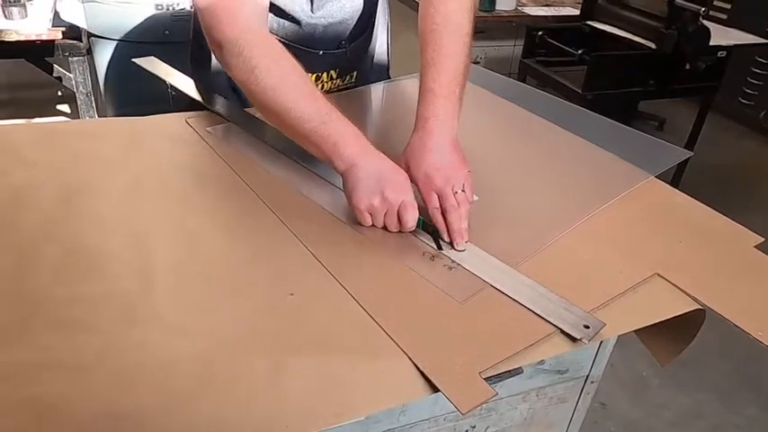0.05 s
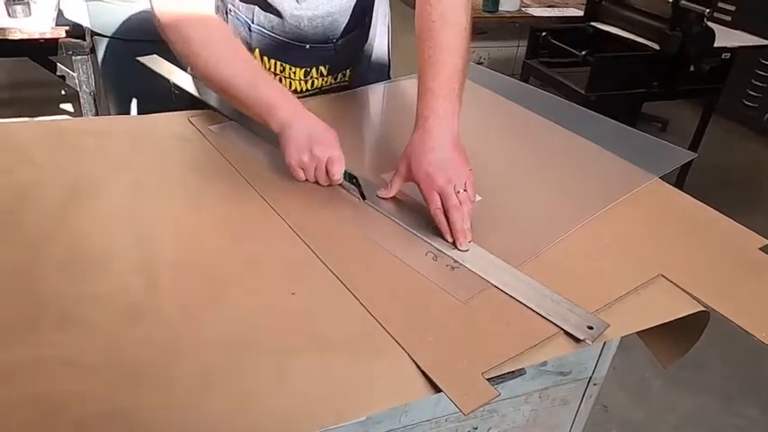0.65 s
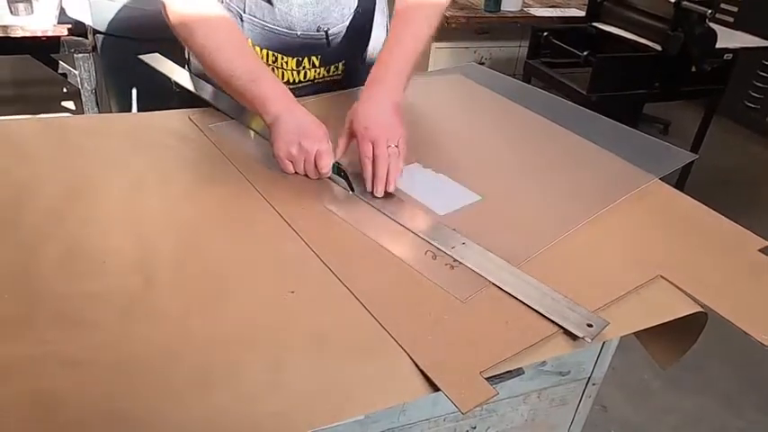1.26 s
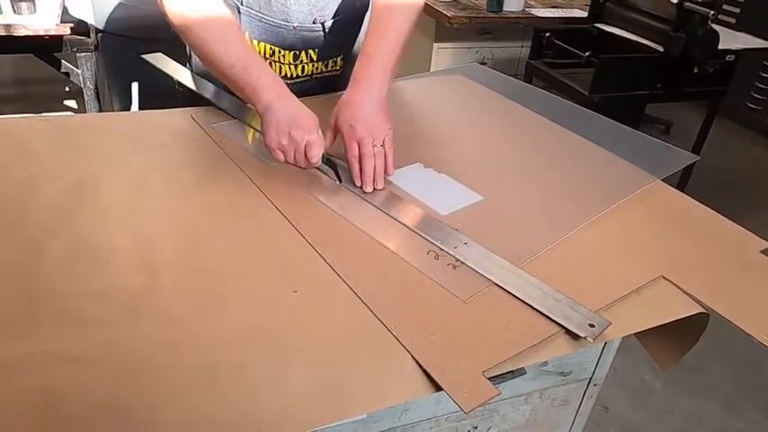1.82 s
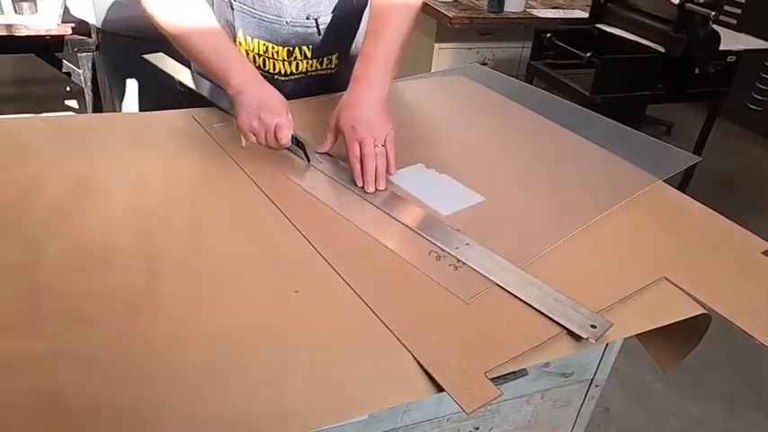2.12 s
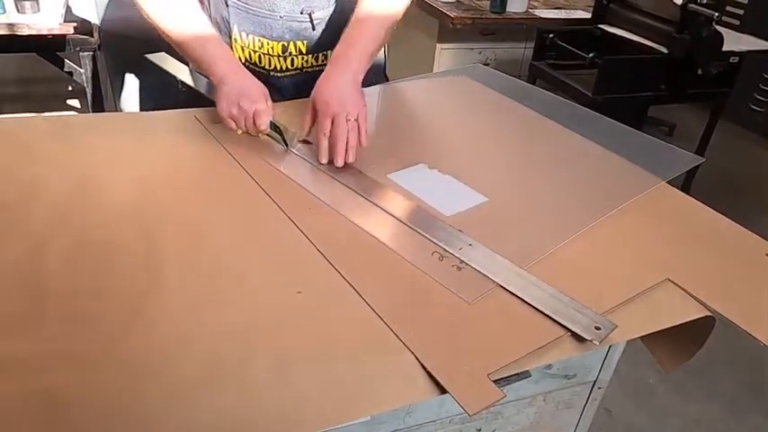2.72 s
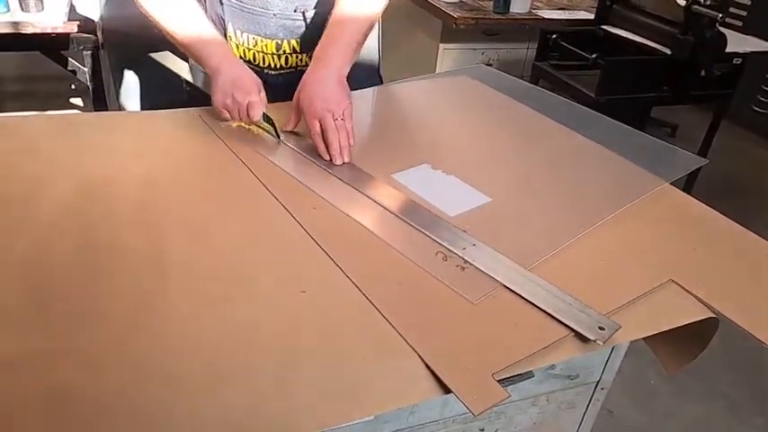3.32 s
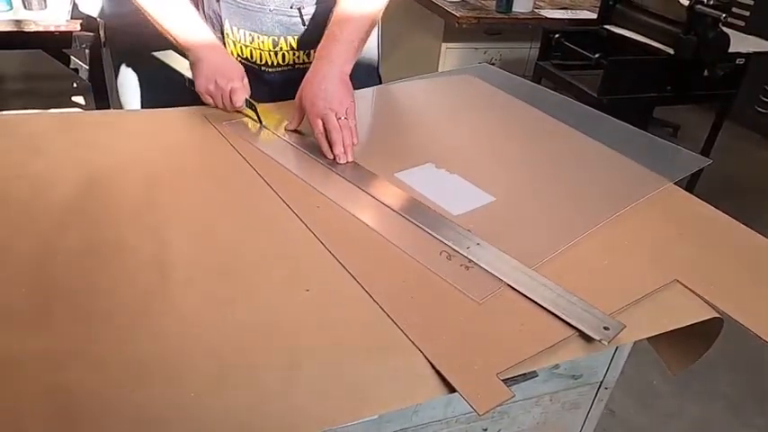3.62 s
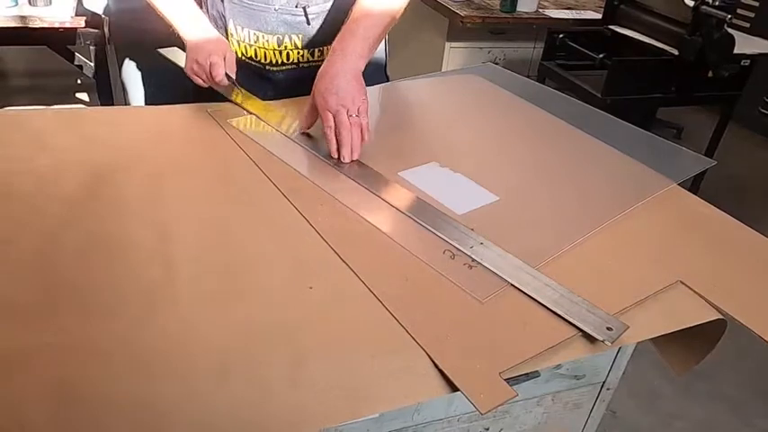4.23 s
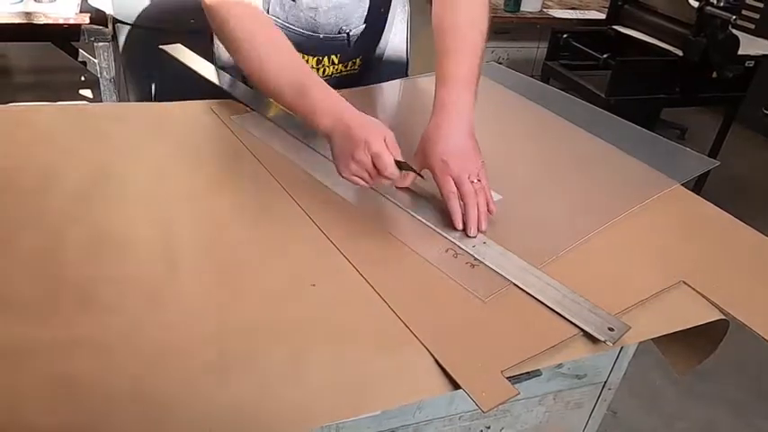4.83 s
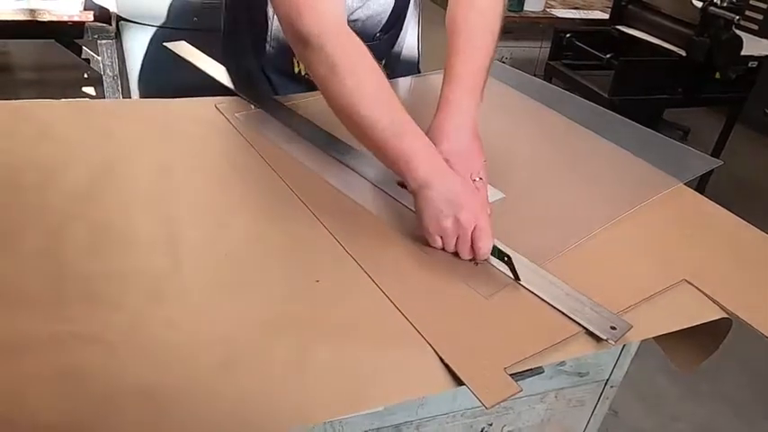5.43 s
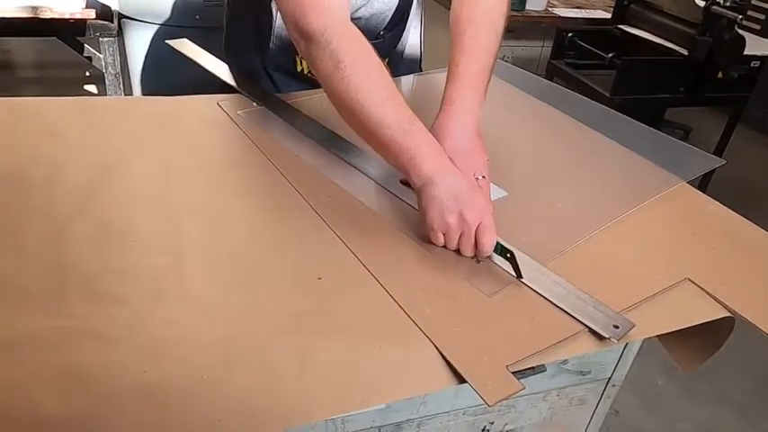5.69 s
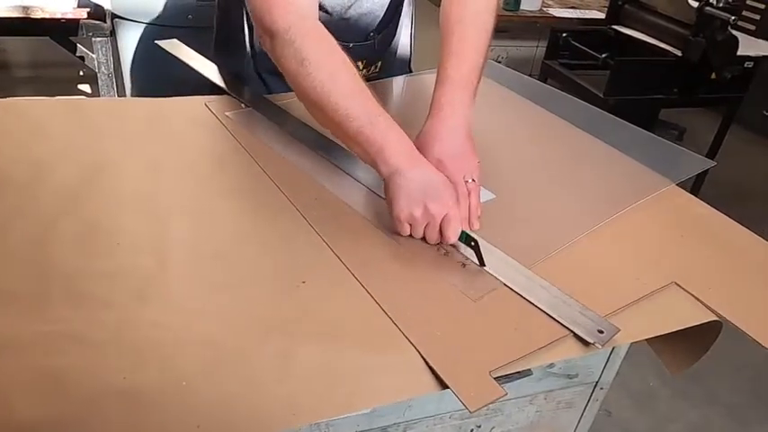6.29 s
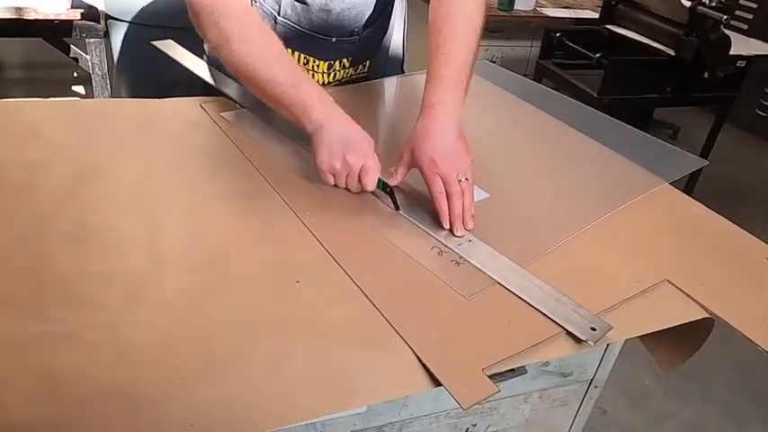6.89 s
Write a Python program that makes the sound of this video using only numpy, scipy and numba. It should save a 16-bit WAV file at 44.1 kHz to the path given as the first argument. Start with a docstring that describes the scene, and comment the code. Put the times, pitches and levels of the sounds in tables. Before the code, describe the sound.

A small tool scores a plastic sheet along a steel straightedge in four rasping, squealing strokes, over a low workshop hum.

```python
"""Scoring an acrylic sheet

A hooked tool is pulled four times along a steel straightedge over an acrylic sheet on a workbench.
Its tip sticks and slips at a rate that follows the hand: ticks at first, then a rough squeal that
rises with speed. Every slip rings the sheet and tears off chips. The workshop echoes it all over the
low hum of its ventilation, and an automatic gain control dips a little under the loudest stroke."""
import sys
import numpy as np
from scipy import signal
from scipy.fft import rfft, irfft
from scipy.io import wavfile
from scipy.ndimage import uniform_filter1d
from numba import njit

SR = 44100
rng = np.random.default_rng(int(sys.argv[2]) if len(sys.argv) > 2 else 0)


def unload_audio(sound):
    """Save the sound as a 16-bit wav file, at the path given as the first command line argument."""
    columns = np.transpose(np.atleast_2d(sound))
    # keep every value between -1 and 1, then stretch to whole-number steps
    steps = np.round(np.clip(columns, -1, 1) * 32767)
    wavfile.write(sys.argv[1], SR, steps.astype(np.int16))


N = 306495
T = np.arange(N) / SR
FREQ = np.maximum(np.arange(N // 2 + 1) * SR / N, 1)

# the four pulls of the hand: start_s, end_s, press_down_s, extra_weight_db
STROKES = [(-.1, 0.876, 0.011, -0.35), (1.713, 2.48, 0.011, 1), (3.205, 3.936, .01, 0.1),
           (6.0, 7.05, 0.22, 1)]
# how strongly the sheet sends out each frequency: frequency_hz, level_db
SHEET_TONE = [(30, -67), (150, -65), (350, -7), (560, -8.5), (720, -6), (920, 4.5), (1300, 2), (1900, -6.5),
              (2900, -10), (3900, -13), (5000, -7), (6500, -12.5), (8100, -16), (9200, -23.5),
              (10200, -17.5), (11300, -23), (12200, -20), (15500, -37.5)]


def undb(db):
    """Turn decibels into a plain multiplier."""
    return 10 ** (np.asarray(db) / 20)


def unit(x):
    """Scale to an average (rms) level of 1."""
    return x / np.sqrt(np.mean(x ** 2))


def even(x, span_s=0.12):
    """Hold the level near 1 over time, keeping the fast grain."""
    power = np.abs(uniform_filter1d(x ** 2, int(span_s * SR)))
    return x / np.sqrt(power + 1e-6 * np.mean(x ** 2))


def curves(rows):
    """Join each column of a table by straight lines in time."""
    times, *columns = np.transpose(rows)
    return [np.interp(T, times, column) for column in columns]


def during(start, end):
    """1 from start to end, with soft edges."""
    return uniform_filter1d(1. * ((T >= start) & (T <= end)), SR // 200)


def db_at(points):
    """Join (frequency_hz, level_db) points into a level for every frequency."""
    hz, db = np.transpose(points)
    return np.interp(np.log(FREQ), np.log(hz), db)


def colour(x, db, size=4096):
    """Filter a sound so that each frequency changes by the given decibels."""
    gain = undb(np.interp(np.linspace(0, SR / 2, size // 2 + 1), FREQ, db))
    # folding the cepstrum makes the filter ring after a hit, never before it
    cepstrum = irfft(np.log(gain))
    cepstrum[1:size // 2] *= 2
    cepstrum[size // 2:] = 0
    return signal.oaconvolve(x, irfft(np.exp(rfft(cepstrum))))[:N]


def split(x, hz):
    """The parts below and above a frequency."""
    return [signal.sosfilt(signal.butter(4, hz, kind, fs=SR, output="sos"), x)
            for kind in ("low", "high")]


def tilt(x, hz, db):
    """Raise or lower everything above a frequency, moment by moment."""
    low = signal.sosfiltfilt(signal.butter(3, hz, fs=SR, output="sos"), x)
    return low + undb(db) * (x - low)


def wander(rate_hz):
    """A random curve of size about 1 that heads for a new value rate_hz times a second."""
    hold = max(int(SR / rate_hz), 1)
    steps = np.repeat(rng.standard_normal(N // hold + 1), hold)
    return unit(uniform_filter1d(steps, hold)[:N])


def sine(hz):
    """A pure tone that follows a changing pitch."""
    return np.sin(2 * np.pi * np.cumsum(hz) / SR)


def diffuse(db, apart_hz):
    """Noise from all sides: left and right are alike in the bass, unrelated in the treble."""
    mid, side = rfft(rng.standard_normal((2, N))) * undb(db)
    side = side * np.minimum(0.013 + FREQ / apart_hz, 1)
    return irfft(np.array([mid + side, mid - side]), N)


def hand(stroke, pull, effort, creep_hz=250.34, creep_hold=0.2, creep_rough=0.34, touch_db=-8.5):
    """The hand presses down, speeds up and brakes; the slower it moves, the quieter and duller."""
    start, end, press_s, weight_db = stroke
    pull_hz, groove, grip = curves(pull)
    body_db, treble_db = curves(effort)
    run_up = np.interp(T, [start + press_s, pull[0][0]], [0, 1])
    brake = np.interp(T, [pull[-1][0], end], [1, 0])
    hz = creep_hz + (pull_hz - creep_hz) * run_up * brake
    octaves = np.log2(hz / pull_hz)
    press_db = weight_db + 20 * np.log10(np.interp(T, [start, start + press_s], [undb(touch_db), 1]))
    db_per_octave = np.where(brake < 1, 9.5, 7)
    level_db = body_db + press_db + octaves * db_per_octave
    bite_db = treble_db - body_db + octaves * 6.5  # a deeper bite means more treble
    # at a creep the tip lets go unevenly and holds through a share of its slips
    creep = (1 - run_up * brake) ** 2
    slip_hz = hz * (1 - creep_hold * creep)
    return np.array([slip_hz, level_db, bite_db, groove + creep_rough * creep, np.clip(grip + creep, 0, 1)])


def gestures():
    """The hand's strokes in turn: each takes over midway through the pause before it."""
    # the tip in full pull, a table per stroke: time_s, slip_hz, roughness (0-1), second_corner_grip (0-1)
    pulls = [
        [(0, 844, 0.08, 0.06), (.07, 818, 0.1, 0.44), (.15, 844, 0.11, 0.15), (.23, 876, 0.08, 0.2),
         (.3, 976, 0.07, 0.2), (.42, 1094, 0.07, 0.07), (.55, 1249, 0.09, 0.33), (.73, 1461, 0.11, 0.17),
         (.775, 1264, 0.08, 0.49), (.8, 1075, 0.02, 0), (.83, 842, .07, 0.4)],
        [(1.785, 680.3, 0.1, 0.1), (1.83, 795, .075, 0.11), (1.87, 935, .085, 0.14), (1.95, 1032, .12, 0.25),
         (2.02, 1172, .15, 0.25), (2.08, 1371, 0.14, 0.37), (2.125, 1114, 0.15, 0.86), (2.18, 1470, 0.11, 0.2),
         (2.22, 1408, .15, 0.2), (2.29, 1544, 0.1, 0), (2.365, 1421, 0.15, 0.16), (2.39, 1096, 0.14, 0.7),
         (2.425, 917.5, 0.14, 0.8), (2.455, 959, 0.21, 0.9)],
        [(3.29, 891, 0.23, 0.81), (3.335, 961, 0.15, 0.7), (3.41, 869.7, 0.2, 0.86), (3.5, 911, 0.2, .6),
         (3.56, 1022, .21, 0.7), (3.62, 956.5, .25, 1), (3.72, 984, .16, 0.61), (3.87, 950.3, 0.18, 0.79),
         (3.91, 783, 0.14, 0.86)],
        [(6.39, 767.3, 0.14, 0.23), (6.43, 832, 0.13, 0.34), (6.47, 940, 0.17, 0.77), (6.53, 992, 0.21, 0.45),
         (6.58, 1033, 0.21, 0.98), (6.7, 1004, 0.13, 1), (6.76, 1200, 0.17, 0.71), (6.81, 1468, 0.18, 0.57),
         (6.845, 1740, 0.15, 0.44), (6.91, 1795, 0.2, 0.61), (6.94, 1863, 0.21, 0.5)],
    ]
    # strength of the pull, a table per stroke: time_s, body_db, treble_db
    efforts = [
        [(0.0, -24.5, -33), (0.124, -29, -31), (.165, -25.5, -29.5), (.22, -25.5, -28.5), (0.29, -23, -28),
         (0.408, -23, -28.5), (0.448, -24.5, -28.5), (0.73, -27.5, -25.5), (0.794, -21.5, -28.5),
         (0.804, -28.5, -28), (0.83, -26.5, -33)],
        [(1.79, -29.5, -36.5), (1.81, -28, -36.5), (1.846, -30, -35.5), (1.875, -26.5, -34),
         (1.988, -27.5, -33.5), (2.042, -25, -29), (2.41, -31, -30.5), (2.45, -32.5, -42)],
        [(3.29, -31, -39), (3.34, -27, -34.5), (3.382, -33, -36), (3.474, -33, -34), (3.508, -34.5, -34),
         (3.75, -32.5, -31), (3.782, -35, -33), (3.9, -31, -33), (3.91, -34.5, -39.5)],
        [(6.39, -30.5, -41), (6.47, -23.5, -31), (6.536, -21, -35), (6.568, -24, -26.5), (6.614, -23.5, -30.5),
         (6.636, -20.5, -25), (6.734, -20.5, -29.5), (6.928, -20, -24), (6.94, -24.5, -22.5)],
    ]
    handover_s = [(before[1] + after[0]) / 2 for before, after in zip(STROKES, STROKES[1:])]
    motions = [hand(*parts) for parts in zip(STROKES, pulls, efforts)]
    return np.choose(np.searchsorted(handover_s, T), motions)


@njit
def stick_slip(hz, rough, chance, size):
    """The tip loads up and lets go after uneven waits; gives the slips and the seconds since the last."""
    slips, age = np.zeros(len(hz) + 1), np.zeros(len(hz))
    load, since, k = 0., 0., 0
    for i in range(len(hz)):
        step = hz[i] / SR * np.exp(rough[i] * chance[k] + rough[i] ** 2 / 2)
        load += step
        since += 1 / SR
        if load >= 1:
            load, since, k = load - 1, 0., k + 1
            share = min(load / step, 1.)  # a slip falls between two samples
            strength = np.exp(np.sqrt(rough[i]) * size[k])
            slips[i] += strength * share
            slips[i + 1] += strength * (1 - share)
        age[i] = since
    return slips[:-1], age


def slipping(hz, rough, jitter=0.6, waver=0.5, scatter=0.62):
    """One corner of the tip slips along; the groove is never quite even, so its rate wavers."""
    timing, size = rng.standard_normal((N // 10, 2)).T
    wavering_hz = hz * np.exp(waver * rough * wander(170))
    return stick_slip(wavering_hz, jitter * rough, timing, scatter * size)


def singing(hz, blur=0.024, ease_s=0.026):
    """The whole tool swings with the slips and gives a clear tone at their rate."""
    # stretches where the tool sings: start_s, end_s, level_db (against the slips)
    stretches = [(-.03, 0.245, -7.5), (1.85, 1.955, -10), (3.27, 3.616, -14.5), (3.68, 3.911, -13.5),
                 (6.382, 6.475, -5.5), (6.82, 6.989, -0.5)]
    swell = sum(undb(db) * np.clip(np.minimum(T - start, end - T) / ease_s, 0, 1)
                for start, end, db in stretches)
    return swell * sine(hz * (1 + blur * wander(400)))


def overtones(hz, slope=0.6, blur_hz=60, fade_hz=1400):
    """Blurred overtones of the chatter glide with the slip rate; a very fast pull loses them."""
    tones = sum(k ** slope * undb(3.2 * wander(9.5)) * sine(k * hz + blur_hz * wander(600))
                for k in range(2, 8))
    return unit(tones) / (1 + (hz / fade_hz) ** 10)


def screech(hz, resonance_hz=2450, width_octaves=0.4, waver=0.075, flutter_db=4):
    """The blade screeches when twice the slip rate passes through its own ringing pitch."""
    pitch = 2 * hz * np.exp(waver * wander(700))
    tone = unit(undb(flutter_db * wander(120)) * sine(pitch))
    return tone * np.exp(-(np.log2(2 * hz / resonance_hz) / width_octaves) ** 2)


def scoring(corner_ratio=1.28, overtone_db=-2, screech_db=-14, chip_db=-8, chip_s=0.00015):
    """Slips and torn chips ring the sheet; a deeper bite adds treble."""
    # resonances of the sheet, pinned in a new place each time, a table per stroke:
    # pitch_hz, width_hz, lift_db
    resonances = [
        [(850, 130, 0.5), (1497, 310, -1), (2200, 1440, 6.5), (3150, 560, 1.5), (5540, 500, 4),
         (12600, 1700, 4.5)],
        [(690, 54, 3.5), (890, 610, -2.5), (1561, 207, 1.5), (2050, 500, 3.5), (2996, 410, 2.5),
         (3868, 366, -1.5), (4928, 250, 0), (10500, 3000, 0.5)],
        [(979, 54, -2), (1254.6, 360, -13.5), (1649, 590, 5), (2168, 409, -3), (3400, 260, 6),
         (3830, 300, -5.5), (4560, 420, 6), (5260, 1200, -4.5), (8900, 4800, 2)],
        [(400.4, 160, 2), (669.7, 170.6, -1.5), (962, 169, 1.5), (1310, 157, 3.5), (1700, 300, 1.5),
         (2050, 420, 5.5), (2738, 565, 1.5), (3455, 408, 0), (8500, 6430, -8)],
    ]
    hz, level_db, bite_db, rough, grip = gestures()
    rough = np.clip(rough, 0.01, 0.8)
    contacts = [during(start, end) for start, end, *_ in STROKES]
    slips, age = slipping(hz, rough)
    # in a rough groove the tip's other corner catches too, a little faster
    corner = grip * even(slipping(hz * corner_ratio, rough)[0])
    # plastic crumbles for a moment after each slip
    crumble = rng.standard_normal(N) * np.exp(-age / chip_s) * undb(5 * wander(900))
    _, chips = split(crumble, hz=1380)
    smoothness = np.exp(-rough / 0.062)
    tones = singing(hz) + undb(overtone_db) * smoothness * overtones(hz)
    force = even(slips) + corner + tones + undb(screech_db) * screech(hz) + undb(chip_db) * even(chips)
    ring = 0
    for contact, modes in zip(contacts, resonances):
        lift_db = sum(db / (1 + (2 * (FREQ - pitch) / width) ** 2) for pitch, width, db in modes)
        ring = ring + colour(force * contact, db_at(SHEET_TONE) + lift_db)
    body, treble = split(ring, hz=3270)
    # a light touch is dull, a deep bite is bright to the very top
    body = even(tilt(body, hz=1900, db=0.67 * (bite_db + 5)))
    treble = even(tilt(treble, hz=5900, db=2.5 + 0.35 * bite_db))
    spurts_db = 0.2 * wander(260)  # chips tear off in spurts
    rasp = undb(-1) * body + undb(bite_db - 0.85 + spurts_db) * treble
    judder_db = 2 * np.minimum(rough, 0.25) * wander(220)  # a rough groove shakes the whole tool
    return rasp * undb(level_db + judder_db) * sum(contacts)


def ventilation(rumble_db=-39, hiss_db=-53.5, hum_db=-2, sway_db=4.5, drift_hz=1.45):
    """The ventilation rumbles, its ducts hiss and its fan hums in wavering tones."""
    # tone of the rumble and of the hiss: frequency_hz, level_db
    rumble_tone = [(12, -41), (20, -1.5), (33, 3), (53, -3.5), (107, -1), (173, -8), (204, -8.5),
                   (233, -10), (287, -7.5), (328, -14), (348, -18), (441, -22.5), (490, -21.5), (552, -31),
                   (700, -24.5), (910, -47), (1540, -120)]
    hiss_tone = [(350, -39.5), (600, -12.5), (703, -20.5), (771, 3), (952, -5), (1130, -7.5), (1210, -10.5),
                 (1610, -9), (2150, -16), (2560, -16.5), (5790, -31.5), (7840, -36), (14000, -67)]
    # the fan's tones: pitch_hz, level_db
    fan_tones = [(27, -52.5), (74.5, -47.5), (104, -48), (205, -53), (284, -56), (318, -57)]
    rumble = unit(diffuse(db_at(rumble_tone), apart_hz=1660)) * undb(rumble_db + 1.5 * wander(7))
    hiss = unit(diffuse(db_at(hiss_tone), apart_hz=2100)) * undb(hiss_db + 0.5 * wander(4.42))
    hum = sum(undb(db + hum_db + sway_db * wander(4)) * sine(hz + drift_hz * wander(6))
              for hz, db in fan_tones)
    return rumble + hiss + np.sqrt(2) * hum


def squeals(waver=0.035, flutter_db=3, gain_db=-2):
    """Thin, unsteady whistles swell and fade over the scoring; in the third stroke some glide quickly upwards."""
    # thin whistles: middle_s, length_s, pitch_hz, glide_octaves_per_s, level_db
    whistles = [(0.061, 0.36, 4640, -0.2, -30), (0.365, 0.27, 4570, .1, -32),
                (.52, 0.099, 5850, 0.5, -28.5), (0.651, .14, 5260, -2, -28),
                (.72, 0.14, 5730, -2.3, -25.5), (.803, 0.072, 2207, -8.5, -31),
                (.8, 0.072, 3300, -8, -30), (1.815, 0.096, 2330, 3.5, -25.5),
                (1.97, 0.16, 2175, 1.7, -25), (1.91, 0.36, 4960, 0, -30.5),
                (2.28, 0.23, 7820, 0.5, -33.5), (2.376, 0.16, 2902, 0.1, -32.5),
                (2.39, 0.17, 4820, 0.4, -36), (3.309, .17, 1762, 1.5, -39),
                (3.432, .3, 5800, 2.1, -34), (3.472, .16, 7870, 3.5, -38),
                (3.62, 0.18, 7500, 3.5, -37.5), (3.53, 0.32, 4717, 2.5, -37),
                (3.63, .2, 3345, 0, -35.5), (3.75, 0.19, 4395, -0.2, -33), (6.3, .25, 2053, -1.2, -49),
                (6.64, .18, 5393, 1.5, -28), (6.762, .14, 2355, 3.5, -25),
                (6.891, .18, 2814, .3, -28.5), (6.89, .16, 2290, 1.5, -28)]
    wobble = 1 + waver * wander(900)
    out = 0
    for middle, length, hz, glide, db in whistles:
        t = np.clip(T - middle, -length / 2, length / 2)
        pitch = hz * 2 ** (glide * t) * wobble
        out = out + undb(db) * np.cos(np.pi * t / length) * sine(pitch)
    return out * undb(gain_db + flutter_db * wander(150))


def thuds(hz=270, width_hz=300, rise_s=0.0082, decay_s=0.05):
    """Dull low thuds: the tip's slow slipping as a stroke gathers speed, and soft knocks as strokes end."""
    # low thuds: peak_s, level_db
    peaks = [(.85, -42), (1.76, -40), (2.46, -41.5), (3.922, -36), (3.995, -51), (6.28, -39)]
    swell = sum(undb(db) * np.exp(-np.maximum((T - peak) / decay_s, (peak - T) / rise_s))
                for peak, db in peaks)
    tone_db = -20 * np.log10(1 + ((FREQ - hz ** 2 / FREQ) / width_hz) ** 2 / 2)
    return swell * unit(colour(rng.standard_normal(N), tone_db))


def catches(gain_db=4, bright_db=1):
    """Lone slips ring the sheet as the tip is set down or digs in."""
    # single catches of the tip: start_s, level_db, treble_over_body_db
    lone_slips = [(1.705, -26, -19), (1.714, -19.5, -18), (1.73, -21.5, -2), (3.203, -20.5, -31),
                  (3.21, -20.5, -14), (3.219, -27, -14), (3.231, -22, -11), (3.915, -25, -2),
                  (4.067, -35, -22), (4.318, -45, -22), (6.187, -22.5, -30), (6.197, -17.5, -32)]
    blows = np.zeros((2, N))  # one row for the body, one for the treble
    for start, db, treble_db in lone_slips:
        blows[:, int(start * SR)] = undb([db, db + treble_db + bright_db])
    ring = colour(signal.unit_impulse(N), db_at(SHEET_TONE))[:SR // 20]
    bands = split(ring / np.abs(ring).max(), hz=1700)
    return undb(gain_db) * sum(signal.fftconvolve(blow, band)[:N] for blow, band in zip(blows, bands))


def scuffs(grain_db=4):
    """Hands and tool rub lightly on the plastic with a grainy hiss."""
    # soft rubs: middle_s, half_length_s, level_db
    rubs = [(4.075, 0.0092, -54.5), (4.534, 0.11, -64), (5.267, .044, -66), (5.524, .012, -61),
            (6.019, 0.03, -57.5), (6.099, 0.021, -61), (6.18, .017, -59)]
    # tone of the rubbing: frequency_hz, level_db
    rub_tone = [(500, -23), (2800, 5), (4300, -1.5), (5700, -1), (7000, -15), (14000, -27)]
    swell = sum(undb(db) * np.exp(-((T - middle) / half) ** 2) for middle, half, db in rubs)
    grains = rng.standard_normal(N) * undb(grain_db * wander(400))
    return swell * unit(colour(grains, db_at(rub_tone)))


def taps(ring_s=0.0037):
    """The blade is lined up against the straightedge: sharp steel ticks that the sheet damps at once."""
    # taps of the blade: start_s, level_db
    hits = [(5.998, -49), (6.081, -41.5), (6.187, -43), (6.197, -39), (6.258, -39)]
    # tone of steel on steel: frequency_hz, level_db
    steel_tone = [(1000, -14), (2300, -9), (3000, 5), (3900, -3), (4600, 8), (5700, -2), (6500, -17),
                  (14000, -40)]
    fade = sum(undb(db) * (T >= start) * np.exp(-np.abs(T - start) / ring_s) for start, db in hits)
    return fade * unit(colour(rng.standard_normal(N), db_at(steel_tone)))


def bounces(x, first_s=0.000725, last_s=0.008, drift_s=0.0005, spacing_s=0.00011, count=8):
    """Echoes off bench, ruler and arms, each from its own side, along paths that slowly drift."""
    out = np.zeros((2, N))
    sides = rng.permutation(np.linspace(-1, 1, count))
    for lag, side in zip(np.geomspace(first_s, last_s, count), sides):
        delay_s = lag + drift_s * (2 + wander(1.5))
        for channel, sign in enumerate((1, -1)):
            out[channel] += np.interp(T - delay_s - sign * side * spacing_s / 2, T, x)
    return out / np.sqrt(count)


def workshop(x, lag_s=0.000028, direct_db=-1, late_db=-10, low_ring_s=0.47, high_ring_s=0.28):
    """The sound reaches the right side first; near surfaces scatter it, then the room rings."""
    # balance between the two sides: frequency_hz, left_minus_right_db
    balance = [(300, 3.5), (700, 0), (1300, -1), (2400, 0.5), (4400, -1), (8000, -3.5), (14000, -5)]
    left = irfft(rfft(x) * np.exp(-2j * np.pi * FREQ * lag_s), N)
    # the sheet throws its treble up and sideways more than forwards
    near = bounces(colour(x, db_at([(2000, -7), (9000, -1)])))
    t = T[:SR]
    room_noise = diffuse(db_at([(1000, 1.2), (12000, -3.5)]), apart_hz=3500)[:, :SR]
    low, high = split(unit(room_noise), hz=4000)
    build_up = 1 - np.exp(-t / 0.0029)
    tail = (low * undb(-60 * t / low_ring_s) + high * undb(-60 * t / high_ring_s)) * build_up
    late = signal.fftconvolve(x[None], undb(late_db) * unit(tail) / np.sqrt(SR), axes=1)[:, :N]
    stereo = undb(direct_db) * np.array([left, x]) + near + late
    return np.array([colour(side, sign * db_at(balance) / 2) for side, sign in zip(stereo, (1, -1))])


def scene():
    """Four strokes in the humming workshop."""
    return workshop(scoring() + squeals() + catches() + taps() + thuds() + scuffs()) + ventilation()


def record(dry):
    """A slow gain control turns the loudest stroke down a little; a filter cuts the highest treble."""
    threshold_db, ratio, response_s, top_hz = -23, 2.84, 0.22, 15600
    memory = np.exp(-1 / (response_s * SR))
    power = signal.lfilter([1 - memory], [1, -memory], np.mean(dry ** 2, axis=0))
    excess = np.sqrt(np.hypot(1, power / undb(threshold_db) ** 2))
    gain = excess ** (1 / ratio - 1)
    return signal.sosfilt(signal.ellip(10, 0.2, 80, top_hz, fs=SR, output="sos"), dry * gain)


dry = scene()
out = record(dry)
unload_audio(out)
```